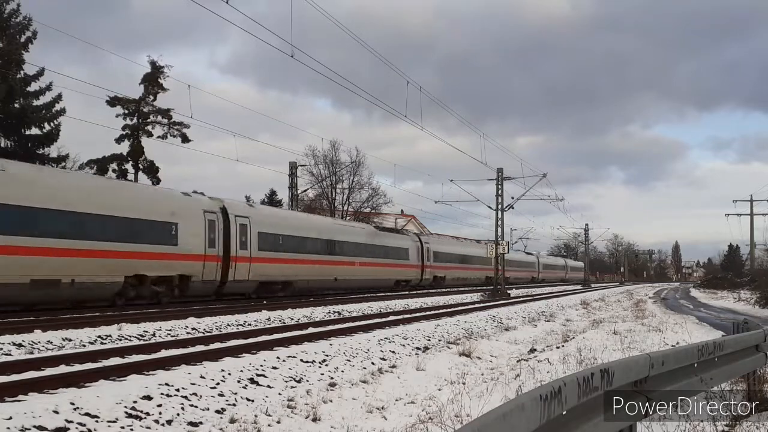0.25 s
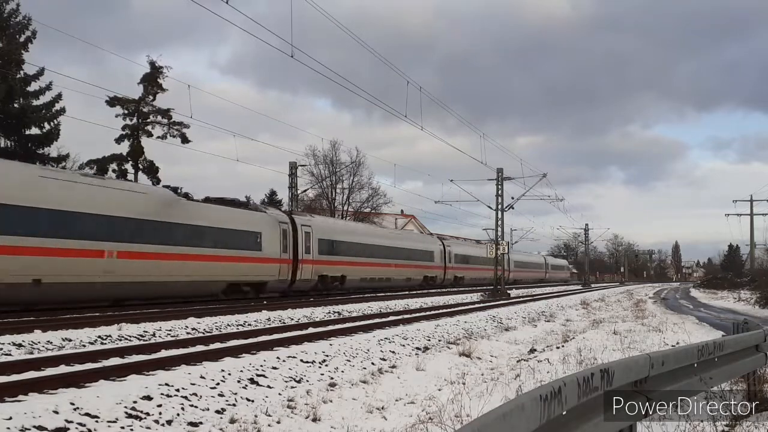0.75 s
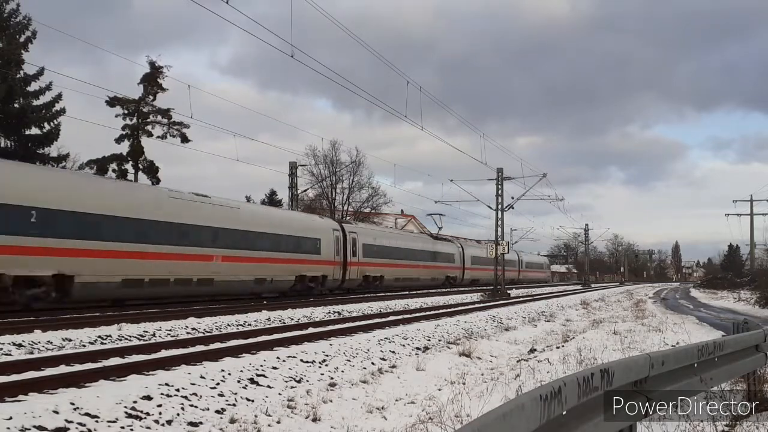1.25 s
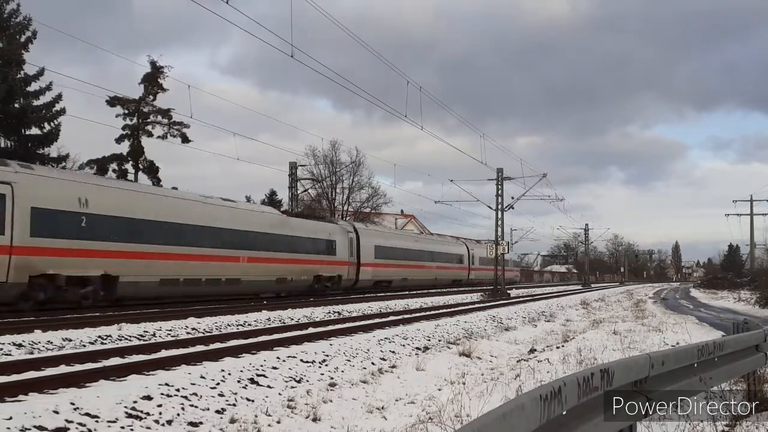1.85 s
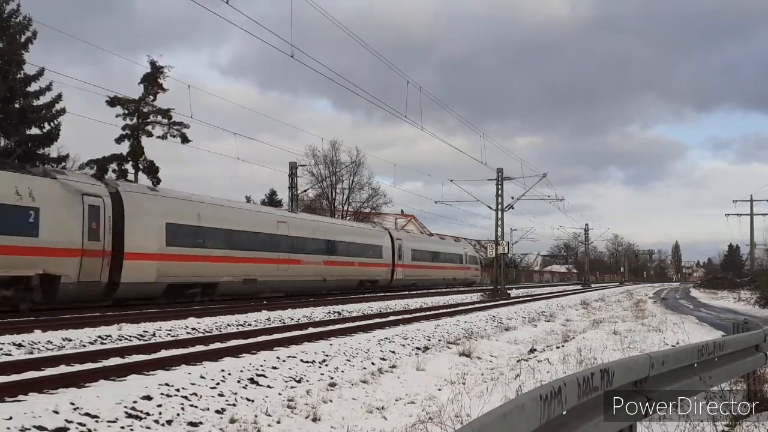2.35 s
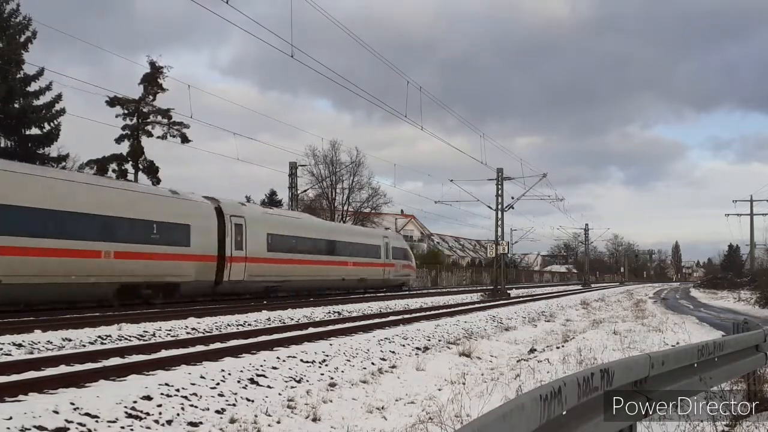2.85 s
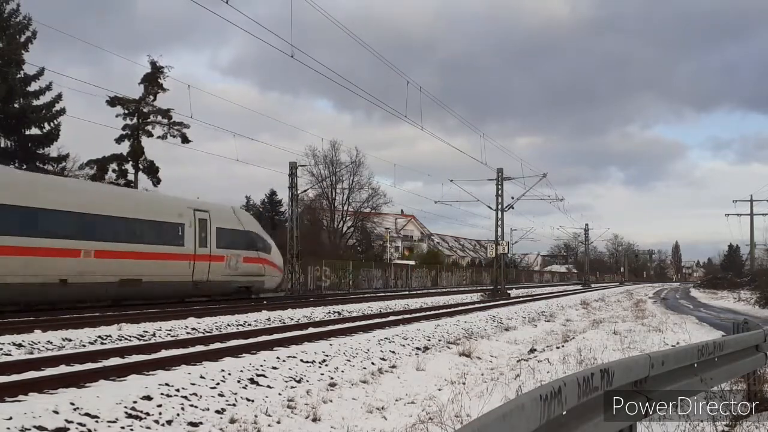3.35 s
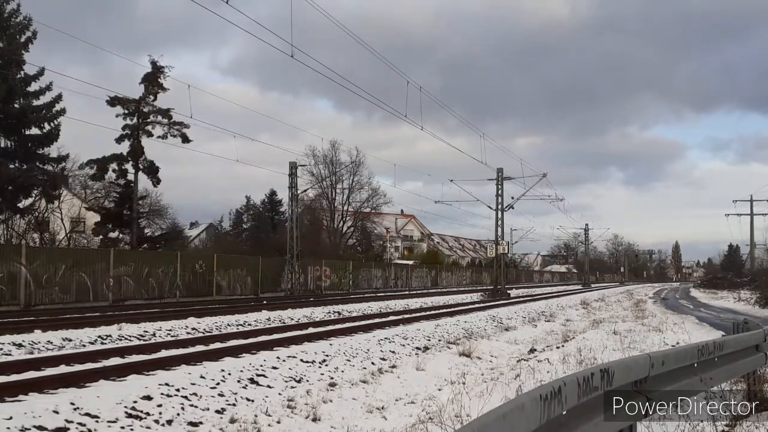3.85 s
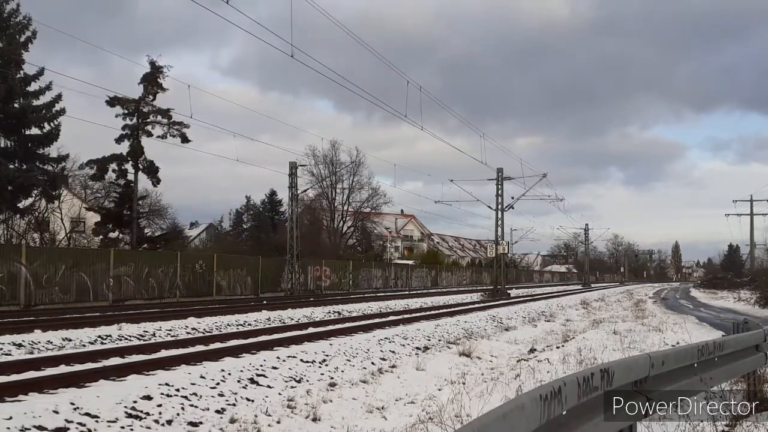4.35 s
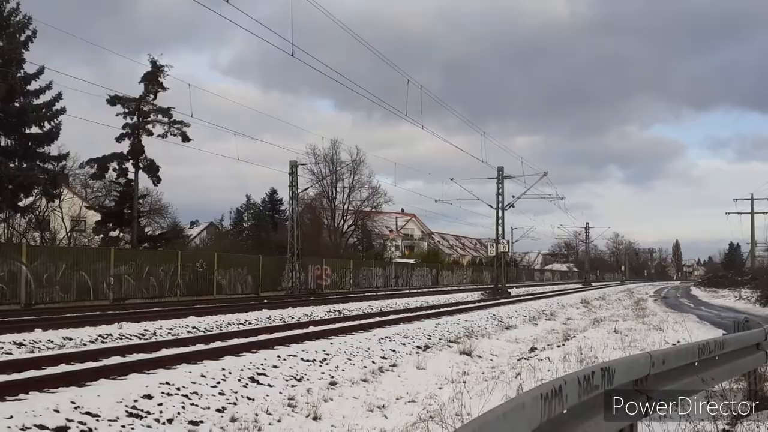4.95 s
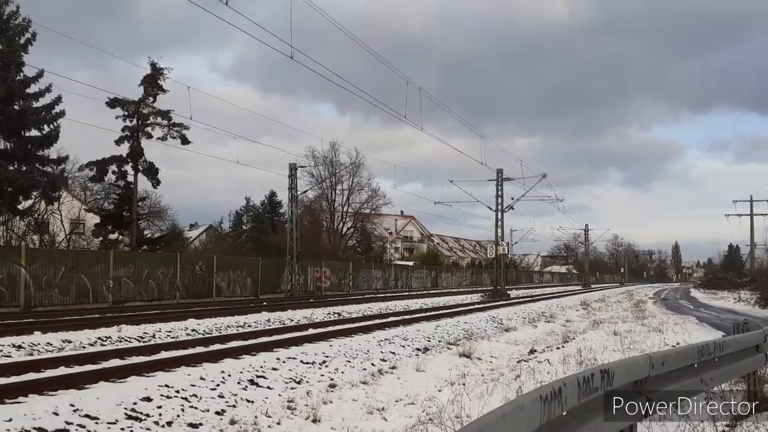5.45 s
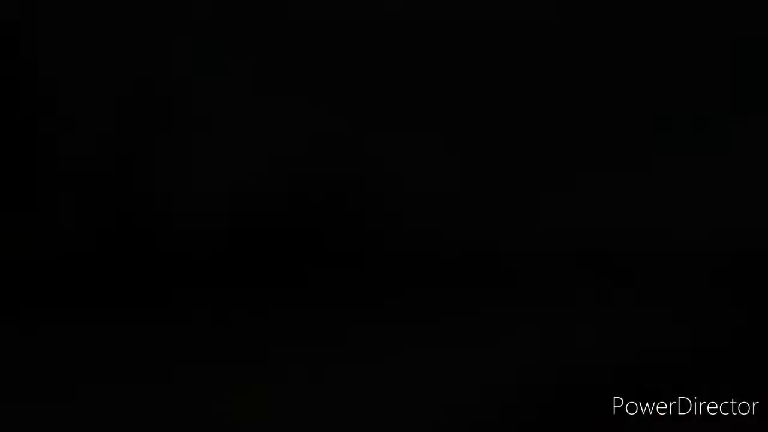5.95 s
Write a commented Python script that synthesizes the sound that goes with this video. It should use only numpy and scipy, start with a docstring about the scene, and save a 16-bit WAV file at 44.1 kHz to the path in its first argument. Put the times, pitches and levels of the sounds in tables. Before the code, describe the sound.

Close trackside stereo pickup of a high-speed train streaming past to the left. Dense steel-wheel roar over bass rumble swells softly car after car, with thin wavering gear tones inside it. The tail passes after four seconds, treble goes first, slipstream bumps the microphone on the right, and a distant rolling murmur remains. A short dropout follows, then very quiet outdoor ambience with a faint rustle.

```python
"""A fast train rushes past on the left of two microphones and fades away, its last cars thumping with wind.
Five bands of shaped noise (rumble, drone, roll, hiss, top hiss) follow the bogies and dull with distance.
Motor and gear whines are wavering tones, most of them falling in pitch; slipstream gusts are low noise
and short wavelets. An edit then leaves silence, followed by a moment of quiet outdoor rumble: steady noise
with a faint rustle that briefly lifts its treble."""
import sys
import numpy as np
from scipy import signal
from scipy.io import wavfile
from scipy.ndimage import uniform_filter1d

SR = 44100
rng = np.random.default_rng(int(sys.argv[2]) if len(sys.argv) > 2 else 0)


def unload_audio(sound):
    """Save the sound as a 16-bit wav file, at the path given as the first command line argument."""
    columns = np.transpose(np.atleast_2d(sound))
    # keep every value between -1 and 1, then stretch to whole-number steps
    steps = np.round(np.clip(columns, -1, 1) * 32767)
    wavfile.write(sys.argv[1], SR, steps.astype(np.int16))


def volts_from_db(level):
    """Convert decibel levels to linear amplitude ratios."""
    exponent = np.asarray(level, float) / 20
    return 10 ** exponent


N = 273728

FRAME, HOP = 2048, 256  # short-time spectra, samples
BOGIE_S, CAR_S = 0.44, 0.64  # a bogie group at its loudest; time from one car to the next
CUT_S, RESUME_S = 5.9135, 6.0664  # the silence left by the edit

# Crossovers between rumble, drone, roll, hiss and top hiss: edge_hz
LAYER_EDGES_HZ = [190, 620, 3200, 9800]
# Spectrum at the microphones with the train alongside; the levels shape each layer:
# frequency_hz, left_db (per Hz), right_db (per Hz), directional_share (0-1)
ALONGSIDE_SPECTRUM = [(50.4, -56, -54, 1), (76.3, -41.5, -40.5, 0.99), (110, -47.5, -42, 0.95),
                      (170, -60, -57.5, 0.86), (332, -52.5, -49, 0.95), (630, -60.5, -57.5, 0.52),
                      (1010, -55, -53, 0.86), (1640, -54, -51, 0.97), (2420, -59.5, -57, 0.81),
                      (3620, -65.5, -65.5, 0.3), (6100, -73, -68.5, 0.33), (8200, -73.5, -73, 0),
                      (9150, -78.5, -100, 0), (10900, -76, -112.5, 0.02), (12750, -72, -82, 0.11),
                      (15000, -79, -89.5, 0.11)]
# The same once the train is gone: frequency_hz, left_db (per Hz), right_db (per Hz), directional_share (0-1)
RECEDING_SPECTRUM = [(50, -57.5, -66, 0.64), (80, -54, -48, 1), (180, -73, -69.5, 0.64),
                     (373, -68.5, -64, 0.99), (670, -75, -75.5, 0.71), (1740, -64, -60, 0.86),
                     (2900, -79, -72, 0.51), (4700, -83, -84, 0.32), (7650, -88.5, -81.5, 0.23),
                     (9400, -96, -102, 0.26), (13000, -75, -85, 0.38), (14600, -81, -92, 0.19)]
# The last car leaves:
# time_s, distance (0 alongside - 1 gone), greatest_left_lead_ms, share_echoed_from_right (0-1)
LEAVING = [(4.3, 0, .55, 0), (4.5, .15, .475, .04), (4.75, .55, .4, .1), (5.05, .9, .34, .17),
           (5.4, 1, .3, .22), (5.9, 1, .283, .25)]
# Centre of the drone from under the cars: time_s, centre_hz
DRONE_CENTRE = [(0, 350), (2.5, 333), (4.4, 277), (4.8, 355), (5.91, 350)]
# Spectral tilt around the rolling noise: time_s, brightness_db_per_octave
ROLL_BRIGHTNESS = [(0, 1), (.45, -.5), (1.2, -1), (2.4, -1), (3.1, -1), (3.6, 2), (4, -0.5), (4.14, 4.5),
                   (4.27, -0.5), (4.45, -0.5), (4.8, 1), (5.3, -1), (5.91, -5)]


def rush(patchy_db=1.2, flicker_db=0.6, steady_hz=400):
    """Broadband source noise: five overlapping bands of one spectrum, dulled as the train recedes."""
    hz, t = spectrum_axes()
    gone, last_lead_ms, echoed = read(LEAVING, t)
    gone = np.clip(gone, 0, 1)
    layers_db = levels(t, gone)
    (drone_hz,) = read(DRONE_CENTRE, t)
    (brightness,) = read(ROLL_BRIGHTNESS, t)

    near = read(ALONGSIDE_SPECTRUM, hz, np.log1p)[..., None]
    far = read(RECEDING_SPECTRUM, hz, np.log1p)[..., None]
    left_db, right_db, direct = near + gone * (far - near)

    octaves = np.log2(hz[:, None] + 1)
    # the louder the drone beside the rumble, the more it gathers round its centre
    hump_height_db = (4.5 + 1.1 * (layers_db[1] - layers_db[0])).clip(0)
    hump_db = hump_height_db * np.exp(-((octaves - np.log2(drone_hz)) / 0.16) ** 2)
    tilt_db = brightness * np.clip(octaves - np.log2(1650), -0.8, 0.8)
    left = volts_from_db(left_db + hump_db + tilt_db)
    right = volts_from_db(right_db + hump_db + tilt_db)

    # power shares of the five bands, which add up to 1 at every frequency
    above = [1 / (1 + (edge / (hz + 1)) ** 8) for edge in LAYER_EDGES_HZ]
    bands = -np.diff([np.ones(len(hz)), *above, np.zeros(len(hz))], axis=0)
    band_power = bands @ (left ** 2 + right ** 2) / 2
    gain = np.sqrt(bands.T @ (volts_from_db(layers_db) ** 2 / band_power))

    unsteady = hz[:, None] / (hz[:, None] + steady_hz)  # the bass is steadier
    ripple_db = patchy_db * patches(24, 14) + flicker_db * patches(300, 5)
    gain *= volts_from_db(unsteady * ripple_db)
    shares, leads_ms = bogies(t)
    leads_ms = np.minimum(leads_ms, last_lead_ms)
    return pair(gain * left, gain * right, direct, shares, leads_ms, echoed)


# One row each for rumble, drone, roll, hiss and top hiss: start_db, drift_db_per_s, last_car_leaves_s,
# fade_db_per_s, distant_rest_db, bogie_swell_db (below 0 = a dip)
LAYERS = [(-24, -0.92, 4.6, 16, -41, 0.7), (-26.5, -0.48, 4.46, 14.5, -47.5, -0.27),
          (-21, -0.21, 4.274, 10, -36.5, 0.4), (-32, -0.45, 4.05, 9, -68, 0.03), (-45, 0, 3.5, 7, -62, 0.6)]


def levels(t, gone, bend_s=0.082, motor_car_s=2.4, motor_car_wide_s=0.71, motor_car_db=3.5, throb_db=3.5):
    """Amplitude modulation: each layer drifts, varies with the bogies, then fades to a rest; dB, a row each."""
    start_db, drift_db, leave_s, fade_db, rest_db, swell_db = np.transpose(LAYERS)[..., None]
    since_s = bend_s * np.logaddexp(0, (t - leave_s) / bend_s)  # bends gradually into the fade
    swell = swell_db * (1 - gone) * np.cos(2 * np.pi * (t - BOGIE_S) / CAR_S)
    db = start_db + drift_db * t - fade_db * since_s + swell
    db = 10 * np.log10(volts_from_db(db) ** 2 + volts_from_db(rest_db) ** 2)
    # the drone swells while the powered cars pass
    db[1] += motor_car_db * np.exp(-((t - motor_car_s) / motor_car_wide_s) ** 2)
    # the top hiss throbs at random as it dies away
    throb = evened(uniform_filter1d(rng.standard_normal(len(t)), size=18))
    db[4] += throb_db * gone * throb
    return db


def bogies(t, side_ms=0.57, past=1.65, sweep=1.5, focus=1.5):
    """Arrival-time difference of moving sources: two bogie groups swing leftwards, each yielding to the next."""
    cars = np.minimum((t - BOGIE_S) / CAR_S, 6.25)  # none follows the last group
    place = np.array([(cars + 1) % 2 - 1, cars % 2 - 1])  # car lengths past the loudest spot
    loud = np.cos(np.pi * place / 2) ** (2 * focus)
    slope = past + sweep * place  # distance along the line over distance across it
    return loud / loud.sum(0), side_ms * slope / np.hypot(1, slope)


# Motor and gear whines: start_s, length_s, first_hz, last_hz, waver_hz (rms), left_level_db
WHINES = [(.34, 0.39, 1630, 1425, 16, -30), (0.346, 0.35, 3100, 2900, 25, -39),
          (1.693, 0.36, 3000, 2830, 38, -37.5), (2.294, 0.37, 2900, 2900, 46, -37.5),
          (2.844, 0.13, 3040, 2900, 40, -36.5), (3.925, 0.57, 329, 270.4, 4.4, -32.5),
          (3.034, 0.2, 325.4, 305, 6.9, -29.5)]


def whines(right_db=4.5, lead_ms=0.48, flutter_db=1.0):
    """Frequency modulation: tones glide or hold, waver and flutter, first on the left and louder on the right."""
    line = np.zeros(N)
    for start_s, length_s, first_hz, last_hz, waver_hz, db in WHINES:
        u = np.arange(0, 1, 1 / (length_s * SR))
        noises = rng.standard_normal((2, SR))
        waver, flutter = (evened(uniform_filter1d(v, size=600))[:len(u)] for v in noises)
        glide = (1 - np.cos(np.pi * u)) / 2
        hz = first_hz + (last_hz - first_hz) * glide + waver_hz * waver
        tone = np.sqrt(2) * np.sin(2 * np.pi * np.cumsum(hz) / SR)
        add(line, start_s, volts_from_db(db + flutter_db * flutter) * tone * np.sin(np.pi * u))
    return np.array([line, volts_from_db(right_db) * np.roll(line, round(lead_ms * SR / 1000))])


# The strongest eddies: time_s, peak_db, pitch_hz, cycles, microphone (0 left, 1 right)
THUMPS = [(4.77, -16, 140, 1.2, 1), (4.812, -10, 170, .7, 1), (4.841, -5.5, 288, 1.8, 1),
          (4.859, -4, 230, 0.99, 1), (4.892, -8.5, 137, 2, 1), (4.913, -8.5, 188, 0.55, 1),
          (4.939, -5, 170, 0.58, 1), (5.042, -9, 157, 1, 1), (5.063, -19.5, 288, 4, 1),
          (5.871, -21, 129, 1.5, 0)]
# Lumpy wind: start_s, length_s, level_db, microphone (0 left, 1 right)
GUSTS = [(3.715, 0.22, -22, 1), (4.776, .18, -21.5, 1), (4.93, .145, -26.5, 1), (5.84, 0.11, -38.5, 0)]


def wind(low_hz=60, high_hz=280, lumpy_db=1.0):
    """Turbulent pressure at a microphone: eddies as short low wavelets over gusts of lumpy low noise."""
    out = np.zeros((2, N))
    t = np.arange(-0.03, 0.03, 1 / SR)
    for s, db, hz, cycles, side in THUMPS:
        envelope = np.exp(-(2 * t * hz / cycles) ** 2)
        add(out[round(side)], s + t[0], -volts_from_db(db) * envelope * np.cos(2 * np.pi * hz * t))

    bed, lumps = rng.standard_normal((2, N))
    band = signal.butter(2, [low_hz, high_hz], "band", fs=SR, output="sos")
    bed = evened(signal.sosfilt(band, bed))
    bed = bed * volts_from_db(lumpy_db * evened(uniform_filter1d(lumps, size=500)))
    for s, length_s, db, side in GUSTS:
        arch = np.sin(np.pi * np.arange(0, 1, 1 / (length_s * SR))) ** 0.5
        add(out[round(side)], s, volts_from_db(db) * arch * bed[round(s * SR):][:len(arch)])
    return out


# Shape of the quiet spectrum; only relative levels count:
# frequency_hz, left_db (per Hz), right_db (per Hz), directional_share (0-1)
QUIET_SPECTRUM = [(40, -75, -58, .6), (120, -75, -68, 0.33), (350, -66, -62.5, 0.57),
                  (700, -76.5, -76, 0.69), (1500, -81.5, -78.5, 0.22), (2510, -100, -92, 0.25),
                  (8600, -103, -100, .2), (15000, -105, -104, 0.18)]
# Course of the quiet after the edit: time_s, level_db, treble_lift_db
QUIET_COURSE = [(6.066, -43, -3), (6.11, -44, -3.5), (6.15, -40.5, -4.5), (6.175, -42, 7.5),
                (6.21, -40.5, -6)]


def quiet(lead_ms=0.27, treble_hz=2200):
    """Filtered ambient noise: distant low rumble with a faint rustle that brightens it."""
    hz, t = spectrum_axes()
    left_db, right_db, direct = read(QUIET_SPECTRUM, hz, np.log1p)[..., None]
    level_db, lift_db = read(QUIET_COURSE, t)
    lift_db = lift_db / (1 + (treble_hz / (hz[:, None] + 1)) ** 4)
    gain = volts_from_db(level_db + lift_db) / np.linalg.norm(volts_from_db(left_db))
    return pair(gain * volts_from_db(left_db), gain * volts_from_db(right_db), direct, [1], [lead_ms], 0)


def pair(left, right, direct, shares, leads_ms, echoed):
    """Partial coherence of two microphones: delayed waves from the left, an echo from the right, diffuse rest."""
    hz, t = spectrum_axes()
    parts = rng.standard_normal((len(t), len(hz), 10)).T
    *waves, echo, rest_left, rest_right = (parts[:5] + 1j * parts[5:]) / np.sqrt(2)
    late = [np.exp(-2j * np.pi * hz[:, None] * ms / 1000) for ms in leads_ms]
    wave_left = sum(np.sqrt(s) * w for s, w in zip(shares, waves))
    wave_right = sum(np.sqrt(s) * w * delay for s, w, delay in zip(shares, waves, late))

    # power shares add up to 1
    direct, echoed = np.clip(direct, 0, 1), np.clip(echoed, 0, 1)
    wave_gain = np.sqrt(direct * (1 - echoed))
    echo_gain = np.sqrt(direct * echoed)
    rest_gain = np.sqrt(1 - direct)
    z_left = left * (wave_gain * wave_left + echo_gain * echo + rest_gain * rest_left)
    # dividing by the delay makes the echo reach the right first
    z_right = right * (wave_gain * wave_right + echo_gain * echo / late[0] + rest_gain * rest_right)
    z = np.array([z_left, z_right]) * np.sqrt(6)  # makes up for overlapping frames of independent noise
    return signal.istft(z, nperseg=FRAME, noverlap=FRAME - HOP)[1][:, :N]


def patches(bins, frames):
    """Smoothed random field over frequency and time, rms 1."""
    hz, t = spectrum_axes()
    field = rng.standard_normal((len(t), len(hz))).T
    field = uniform_filter1d(field, bins, axis=0)
    return evened(uniform_filter1d(field, frames, axis=1))


def spectrum_axes():
    """Short-time Fourier analysis: bin frequencies in Hz and frame times in s."""
    return np.fft.rfftfreq(FRAME, 1 / SR), np.arange(N // HOP + 5) * HOP / SR


def evened(x):
    """Normalization to rms 1."""
    return x / np.sqrt(np.mean(x ** 2) + 1e-20)


def read(rows, at, scale=lambda v: v):
    """Linear interpolation between the rows of a table, one array a column."""
    first, *columns = np.transpose(rows)
    return np.array([np.interp(scale(at), scale(first), c) for c in columns])


def add(mix, s, sound):
    """Superposition: adds a sound to the mix from time s."""
    part = mix[round(s * SR):][:len(sound)]
    part += sound[:len(part)]


def scene():
    """Superposition of the passing train's sources, then the quiet place that follows the edit."""
    passing = rush() + whines() + wind()
    return np.where(np.arange(N) / SR < CUT_S, passing, quiet())


def low_pass(x):
    """Removes everything above the highest recorded frequency."""
    return signal.sosfilt(signal.butter(12, 15540, fs=SR, output="sos"), x)


def record(dry):
    """High-pass response of the microphones, which cut the deepest bass, and the edit's gap of silence."""
    t = np.arange(N) / SR
    bass_cut = signal.butter(4, 52, "high", fs=SR, output="sos")  # 52 Hz
    thin = signal.sosfilt(bass_cut, dry)
    sounding = (t < CUT_S) | (t > RESUME_S)
    return low_pass(thin * sounding)


dry = scene()
out = record(dry)
unload_audio(out)
```